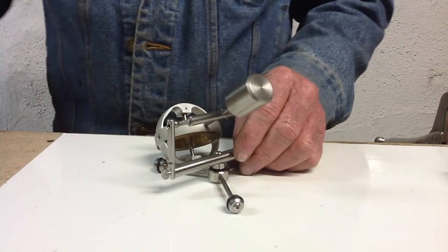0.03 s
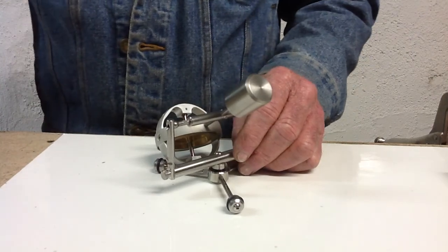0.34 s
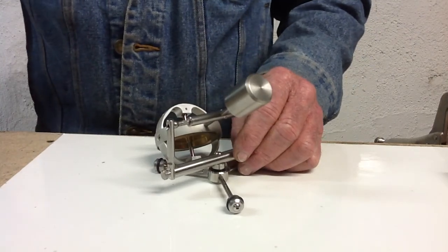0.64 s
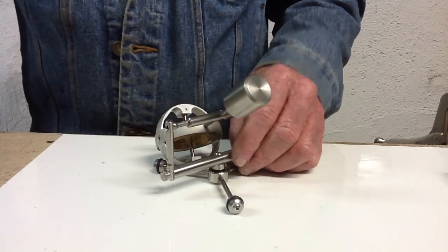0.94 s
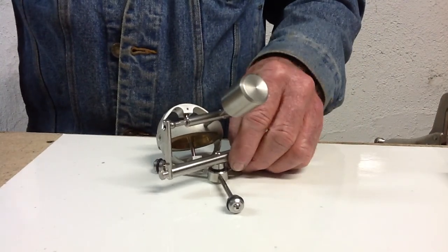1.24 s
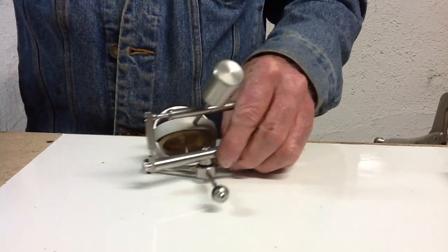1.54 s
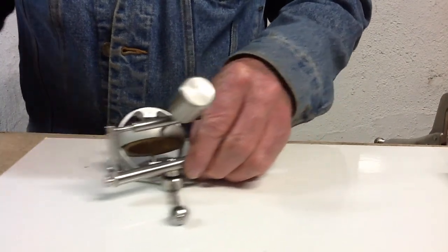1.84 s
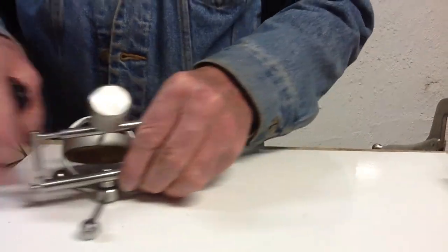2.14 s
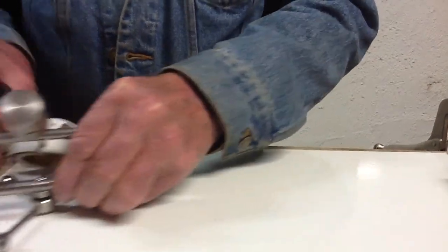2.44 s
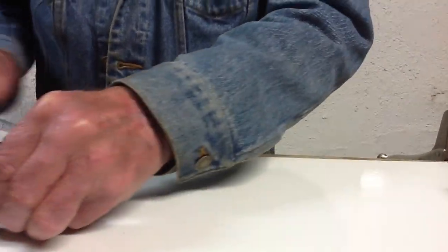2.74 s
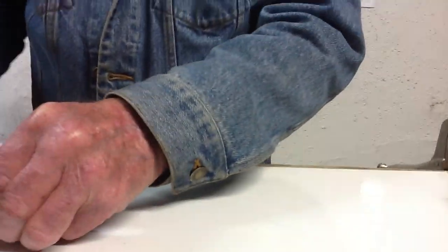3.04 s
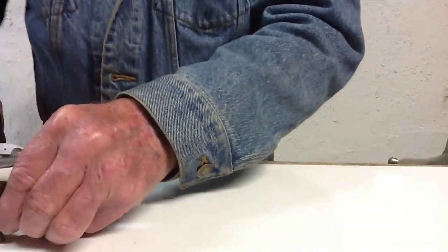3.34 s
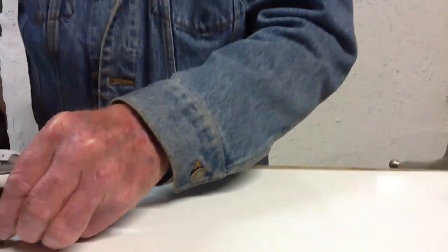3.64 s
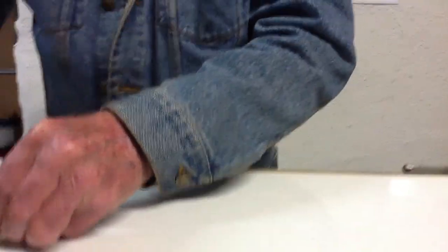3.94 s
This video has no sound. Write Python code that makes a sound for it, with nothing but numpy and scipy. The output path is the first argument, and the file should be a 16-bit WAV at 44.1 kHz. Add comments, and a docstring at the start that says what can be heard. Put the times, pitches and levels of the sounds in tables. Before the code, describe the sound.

Small electric motor whines and winds down, then a metal whir and thumps on a table.

```python
"""At a table in a small room, an electric motor drives a gyroscope, is switched off and coasts to rest,
its whine falling and its brushes hissing and squealing. The flywheel runs on, its bearings ringing the
metal frame. The stand is slid aside, things are put down with thumps and a clack that ring the table
top, and a denim sleeve rubs and ticks near the microphone."""
import sys
import numpy as np
from scipy import signal
from scipy.fft import rfft, irfft
from scipy.io import wavfile

SR = 44100
rng = np.random.default_rng(int(sys.argv[2]) if len(sys.argv) > 2 else 0)


def master(y):
    """Save y as 16-bit WAV."""
    cut = np.clip(np.atleast_2d(y).T, -1, 1)
    pcm = np.round(cut * 32767)  # scale
    wavfile.write(sys.argv[1], SR, pcm.astype(np.int16))


N = 176400
T = np.arange(N) / SR
HIT_T = T[:SR // 2]

# shaft speed under power: time_s, speed_hz
MOTOR_SPEED = [(0, 255.5), (.16, 255.8), (.33, 255.5), (.4, 255.05), (.66, 254.95), (.82, 255.8),
               (.86, 256.4), (.96, 256.3)]
# partials of the powered whine: harmonic, level_db
WHINE_PARTIALS = [(1, -61.5), (2, -75), (3, -65), (4, -69), (5, -65), (7, -81), (8, -72.5), (9, -68),
                  (10, -61), (11, -58.5), (13, -61), (14, -76), (15, -72.5), (16, -87), (17, -68.5),
                  (18, -62), (19, -66), (21, -68.5), (22, -74), (24, -59), (25, -63), (26, -72), (28, -61),
                  (29, -59.5), (31, -79), (32, -59), (33, -57), (34, -70), (35, -60), (37, -79), (38, -71),
                  (39, -67), (40, -68), (41, -68), (42, -67), (44, -79), (45, -65.5), (46, -72), (47, -74),
                  (48, -54.5), (49, -69), (50, -74), (51, -60), (52, -62), (53, -74), (55, -75), (56, -69),
                  (58, -70), (59, -63)]
# partials that swell and fade on their own, keyed by harmonic: time_s, level_db
WHISTLE_LEVELS = {12: [(0, -60), (.4, -53.5), (.52, -50), (.64, -52.5), (.95, -54.5)], 20: [(0, -74),
                  (.45, -71), (.65, -63), (.8, -80)], 27: [(0, -51.5), (.5, -52.5), (.62, -66), (.8, -52),
                  (.95, -56.5)], 30: [(0, -52), (.26, -46), (.44, -47.5), (.6, -55), (.73, -60),
                  (.95, -59)], 36: [(0, -44), (.15, -46), (.24, -54.5), (.48, -55), (.66, -63), (.78, -63),
                  (.95, -70)], 54: [(0, -64), (.11, -49), (.24, -50), (.36, -64), (.52, -50), (.8, -55),
                  (.88, -66)], 57: [(0, -59), (.1, -50), (.24, -54), (.32, -69), (.66, -57), (.88, -53),
                  (.95, -58)]}
# resonances of the motor housing: frequency_hz, gain_db
HOUSING_EQ = [(200, -14), (1200, -2), (1900, -14), (2400, -3.5), (2650, -7), (3000, 1.5), (3900, -8),
              (5100, -1), (5500, -7), (6400, 3), (6750, 0), (7600, -0.5), (9050, 7), (9600, -11),
              (12800, -6), (14300, 0), (15300, -6)]
# fade of the coasting whine: time_s, level_db
COAST_LEVEL = [(.96, -59.5), (1.05, -60.5), (1.11, -64), (1.16, -62), (1.2, -66), (1.3, -69.5), (1.4, -73),
               (1.6, -91), (1.85, -86)]
# brush squeal, relative to the coasting whine: time_s, gain_db
SQUEAL_GAIN = [(1.1, -33), (1.18, -17), (1.245, 10.5), (1.28, -2), (1.33, 6), (1.42, -1)]
# tone of the brush hiss: frequency_hz, gain_db
BRUSH_EQ = [(150, -2), (400, -11), (800, 2.5), (1200, -2.5), (2400, -2.5), (4000, -22), (5800, -10),
            (7200, 2), (9000, -3), (10600, 1.5), (12500, -6), (15000, -1)]
# fade of the brush hiss: time_s, level_db
HISS_LEVEL = [(0, -54.5), (.5, -54), (.95, -54.5), (1.3, -54), (1.5, -54), (1.66, -56.5), (1.8, -63),
              (2, -90)]
OFF_S, COAST_HZ_PER_S, COAST_EASE_HZ_PER_S2 = .962, 292, 40
SQUEAL_HZ, SQUEAL_WIDTH_HZ, COMMUTATOR_DB = 8900, 1400, 13

# frame resonances rung by the bearings: pitch_hz, base_width_hz, gain_db
FRAME_MODES = [(1200, 150, -8), (1703, 165, -4.5), (1835, 17, -13.5), (2378, 25, -11.5), (3200, 33, -12.5),
               (6400, 91, -7.5), (7370, 350, -11), (8700, 74, -7.5), (9960, 190, -0.5), (10230, 140, -15),
               (13400, 300, -7)]
# envelope of those resonances together: time_s, level_db
FRAME_ENVELOPE = [(0, -53), (1.3, -58), (1.45, -66), (1.78, -56), (2.05, -51.5), (2.45, -51.5),
                  (2.7, -52.5), (3.2, -56), (4, -50)]
# envelope of the frame's strongest ring: time_s, level_db
RING_ENVELOPE = [(0, -59), (.95, -56.5), (1.17, -58), (1.3, -58.5), (1.6, -60), (1.7, -58.5), (1.8, -57),
                 (1.95, -58.5), (2.04, -49), (2.13, -56), (2.5, -54), (2.84, -65), (3.1, -60.5),
                 (3.22, -76)]
CAGE_HZ, RING_HZ, RING_WIDTH_HZ, RING_EVENNESS = 11.8, 4566, 66, .7

# room tone and microphone noise: frequency_hz, gain_db
ROOM_TONE_EQ = [(20, -13), (50, -2), (100, 0.5), (135, 8), (160, 17), (190, 9.5), (260, 9), (330, 4),
                (550, 5), (800, 2.5), (1400, -1), (2100, -5.5), (2700, -4), (3400, -1.5), (4000, -6.5),
                (5000, -4), (8000, -6.5), (10500, 2.5), (11500, 0), (12800, -6.5), (15300, -9)]

# snaps of switch and metal: start_s, level_db, centre_hz, width_hz, t60_s
SNAP_CUES = [(0.9763, -29.5, 6150, 9000, 0.008), (0.9795, -32, 2010, 1790, 0.014),
             (1.375, -54.5, 2380, 50, 0.29), (2.775, -31.5, 2100, 805, 0.014),
             (2.774, -29.5, 10600, 8900, 0.011), (2.887, -32, 6000, 12000, 0.0046),
             (3.2508, -27.5, 930, 940, 0.016), (3.25, -39.5, 3000, 5000, 0.014),
             (3.301, -38, 3000, 4000, 0.0037), (3.622, -35.5, 8300, 3000, 0.014),
             (3.63, -32, 8600, 3530, .006), (3.892, -35, 7000, 1500, 0.013)]
# dull thumps, and the low swing under the sharp tick at 1.70 s:
# start_s, level_db, cutoff_hz, note_pitch_hz, note_t60_s, note_gain_db
THUMP_CUES = [(.981, -43.5, 2500, 1020, 0.027, 5), (0.988, -41, 297, 133, 0.056, 3.5),
              (1.704, -49.5, 450, 181, 0.09, 9.5), (2.637, -38, 705, 562, 0.17, -1),
              (2.640, -56, 303, 190, 0.12, 20), (2.774, -48.5, 1800, 600, .015, 9),
              (2.856, -36, 1360, 510, 0.07, 4), (2.868, -36, 810, 260, 0.15, 3),
              (2.886, -39, 880, 246, 0.092, 7), (2.948, -43, 500, 262, 0.094, 3),
              (3.076, -55, 398, 259.6, 0.29, 8.5), (3.201, -37.5, 595, 317, 0.019, 10.5),
              (3.242, -41, 1370, 830, 0.023, 5), (3.252, -43, 1540, 990, 0.0067, 21.5),
              (3.371, -38, 1100, 285, 0.15, -1), (3.386, -41, 900, 370, .04, 4.5),
              (3.41, -52, 794, 477, 0.033, 21.5), (3.463, -50, 700, 185, 0.051, 19),
              (3.605, -33.5, 900, 513, 0.014, 9), (3.819, -34.5, 590, 288, 0.033, -3),
              (3.892, -36, 1090, 337, 0.025, -9)]
# modes of the table top: pitch_hz, gain_db, t60_s
TABLE_MODES = [(124, -7.5, 0.31), (193, -6, 0.11), (261.8, -4.5, 0.17), (384.5, -3, 0.11),
               (510, -7.5, 0.037), (597, -14.5, 0.15), (671, -9, 0.052), (769, -14, 0.17),
               (1054, -9, 0.091), (1215, -35, 0.12), (1560, -3, 0.046)]
# a hard object set down: start_s, level_db
CLACK_CUES = [(3.3679, -22), (3.378, -56)]
# modes of that object: pitch_hz, gain_db, t60_s
CLACK_MODES = [(1000, -18, 0.044), (1470, -6, 0.013), (1737, 1, 0.032), (1860, -3.5, 0.04),
               (2390, -22, 0.03), (2850, -8, 0.019), (3050, -17, 0.025), (3165, -15.5, 0.023)]

# dry ticks: start_s, level_db
TICK_CUES = [(1.7037, -14.5), (3.606, -21), (3.6431, -4), (3.652, -27), (3.662, -27), (3.694, -24.5),
             (3.708, -35), (3.721, -21), (3.73, -27), (3.743, -28), (3.751, -21), (3.762, -23.5),
             (3.777, -19.5), (3.798, -23.5), (3.857, -25), (3.875, -24), (3.951, -20)]
# tone of a tick: frequency_hz, gain_db
TICK_EQ = [(30, -25), (150, -12), (330, 15.5), (550, 14), (1000, 9.5), (2500, 9.5), (5000, 4.5), (9000, 3),
           (12000, 1.5), (16000, -31.5)]

# tone of the sliding stand: frequency_hz, gain_db
SLIDE_EQ = [(50, -28), (110, -9.5), (160, 3.5), (250, -4), (400, -10.5), (620, -14.5), (1200, -25),
            (4000, -35)]
# the two pushes of the slide: time_s, level_db
SLIDE_ENVELOPE = [(1.7, -90), (1.9, -68), (2.2, -53.5), (2.42, -57.5), (2.55, -78), (2.8, -57), (3.1, -90)]

# tone of the sleeve's rumble: frequency_hz, gain_db
RUMBLE_EQ = [(20, -39), (60, -15), (95, -23), (125, 3.5), (190, -6), (260, 8.5), (320, -4.5), (480, -2.5),
             (700, -21.5), (1100, -18), (2000, -50), (5000, -55)]
# swells of the rumble: time_s, level_db
RUMBLE_ENVELOPE = [(3.05, -80), (3.18, -58), (3.25, -47), (3.33, -56.5), (3.42, -46.5), (3.52, -56),
                   (3.59, -37.5), (3.72, -37.5), (3.8, -39.5), (3.89, -35), (3.95, -38.5), (4, -38.5)]
# tone of the sleeve's rasp: frequency_hz, gain_db
RASP_EQ = [(200, -11), (800, 5), (1700, 3), (3000, -3), (5000, -2.5), (8000, -7), (10500, -4.5),
           (13000, -17), (15500, -13)]
# swells of the rasp: time_s, level_db
RASP_ENVELOPE = [(3.05, -84), (3.19, -52), (3.25, -54.5), (3.33, -56), (3.45, -49.5), (3.56, -49),
                 (3.63, -44.5), (3.68, -46.5), (3.76, -42), (3.84, -46), (3.91, -51), (4, -38.5)]

KNOCK_SEND_DB, TICK_SEND_DB, HIGH_CUT_HZ = -9, -46, 15450


def amp(db):
    """Decibels to gain."""
    return 10 ** (np.asarray(db) / 20)


def unit(x):
    """Scales to rms 1."""
    return x / np.sqrt(np.mean(x ** 2) + 1e-20)


def curve(points):
    """An automation curve at every sample."""
    return np.interp(T, *np.transpose(points))


def eq_db(eq, hz):
    """An EQ curve's gain, read on a log-frequency axis."""
    corners_hz, db = np.transpose(eq)
    return np.interp(np.log(hz + 1), np.log(corners_hz), db)


def colour(x, eq):
    """Applies an EQ curve and scales to rms 1."""
    return unit(irfft(rfft(x) * amp(eq_db(eq, np.fft.rfftfreq(N, 1 / SR))), N))


def add(mix, start_s, sound):
    """Mixes a sound in at its cue."""
    part = mix[round(start_s * SR):][:len(sound)]
    part += sound[:len(part)]


def drift(hz):
    """Smooth random wander of rms about 1, rolling off around hz."""
    rates_hz = np.fft.rfftfreq(800, 1 / 200)
    slow = unit(irfft(rfft(rng.standard_normal(800)) * np.exp(-(rates_hz / hz) ** 2)))
    return np.interp(T, np.linspace(0, T[-1], len(slow)), slow)


def resonate(x, hz, *widths_hz):
    """Resonators in series at one pitch, one for each width."""
    for width in widths_hz:
        radius = np.exp(-np.pi * width / SR)
        x = signal.lfilter([1 - radius], [1, -radius * np.exp(2j * np.pi * hz / SR)], x).real
    return x


def lowpass(x, hz):
    """A gentle treble cut."""
    return signal.lfilter(*signal.butter(2, hz, fs=SR), x)


def highpass(x, hz):
    """A bass cut."""
    return signal.sosfilt(signal.butter(3, hz, "highpass", fs=SR, output="sos"), x)


def decay(t60_s):
    """An envelope that falls 60 dB in t60_s."""
    return np.exp(-np.log(1000) * HIT_T / t60_s)


def burst(t60_s):
    """Noise that dies away."""
    return rng.standard_normal(len(HIT_T)) * decay(t60_s)


def ring(modes, spread_db=0):
    """Decaying modes of alternating polarity, their strengths varying with the place struck."""
    out = np.zeros(len(HIT_T))
    for k, (hz, db, t60_s) in enumerate(modes):
        gain = (-1) ** k * amp(db + spread_db * rng.standard_normal())
        out += gain * decay(t60_s) * np.sin(2 * np.pi * hz * HIT_T)
    return out


def powered_whine(angle):
    """Shaft harmonics under power; the higher ones waver more and slowly sink in level."""
    partials = [(k, curve(points)) for k, points in WHISTLE_LEVELS.items()]
    for k, db in WHINE_PARTIALS:
        height = k / WHINE_PARTIALS[-1][0]
        waver_db = 2.5 * (.5 + height) * drift(hz=4)
        sag_db = 5 * height * (T - OFF_S / 2)
        partials.append((k, db + waver_db - sag_db))
    out = np.zeros(N)
    for k, level_db in partials:
        jitter = .08 * drift(hz=8)
        out += amp(level_db) * np.cos(k * angle + jitter + 2 * np.pi * rng.random())
    return out


def coasting_whine(angle, speed_hz):
    """Rough shaft harmonics glide down through the housing's resonances and the brushes' squeal."""
    squeal = amp(curve(SQUEAL_GAIN))
    out = np.zeros(N)
    for k in range(1, 130):
        hz = k * speed_hz
        cut_db = COMMUTATOR_DB if k > 14 and k % 3 else 0  # every third high partial stands out
        gain = amp(eq_db(HOUSING_EQ, hz) - cut_db + 3 * drift(hz=14)) * (hz < HIGH_CUT_HZ)
        gain *= 1 + squeal * np.exp(-((hz - SQUEAL_HZ) / SQUEAL_WIDTH_HZ) ** 2)
        jitter = 1.15e-4 * hz * drift(hz=100)
        out += gain * np.cos(k * angle + jitter + 2 * np.pi * rng.random())
    return out * amp(curve(COAST_LEVEL)) * (speed_hz > 10)


def motor():
    """The whine holds until switch-off, then winds down; the brush hiss pulses once a turn."""
    coast_s = np.maximum(T - OFF_S, 0)
    lost_hz = COAST_HZ_PER_S * coast_s - COAST_EASE_HZ_PER_S2 * np.minimum(coast_s, 1) ** 2
    speed_hz = np.maximum(curve(MOTOR_SPEED) - lost_hz, 0)
    angle = 2 * np.pi * np.cumsum(speed_hz) / SR
    power = np.clip(1 - coast_s / 0.038, 0, 1)  # 38 ms crossfade
    whine = power * powered_whine(angle) + (1 - power) * coasting_whine(angle, speed_hz)
    hiss = colour(rng.standard_normal(N) * (1 + .5 * np.cos(angle)), BRUSH_EQ)
    return np.sqrt(2) * whine + hiss * amp(curve(HISS_LEVEL))


def flywheel():
    """Bearing noise, throbbing with the ball cage, rings the frame."""
    cage = 2 * np.pi * np.cumsum(CAGE_HZ * (1 + 0.094 * drift(hz=1.6))) / SR
    throb = np.exp(0.24 * (0.45 * np.cos(cage) + np.cos(2 * cage) + .5 * np.cos(3 * cage)))
    roll = rng.standard_normal(N) * throb
    frame = sum(amp(db) * unit(resonate(roll, hz, 1.07 * width, 6 * width))
                for hz, width, db in FRAME_MODES)
    tone = resonate(roll, RING_HZ, RING_WIDTH_HZ, RING_WIDTH_HZ)
    compressed = tone / (abs(signal.hilbert(tone)) + 1e-9) ** RING_EVENNESS
    rough_ring = unit(compressed * (1 + 0.42 * drift(hz=76)))
    return unit(frame) * amp(curve(FRAME_ENVELOPE)) + rough_ring * amp(curve(RING_ENVELOPE))


def room_tone(level_db=-52.5):
    """A faintly fluttering bed of room and microphone noise."""
    return amp(level_db + 1.83 * drift(hz=31)) * colour(rng.standard_normal(N), ROOM_TONE_EQ)


def snap(hz, width_hz, t60_s):
    """A short rattle of noise in one resonance."""
    noise = rng.standard_normal(len(HIT_T))
    return unit(resonate(noise, hz, width_hz, width_hz)) * decay(t60_s)


def thump(cutoff_hz, note_hz, note_t60_s, note_db):
    """Muffled table-top modes and a thud of noise, with one short pitched note."""
    body = ring(TABLE_MODES, spread_db=3.25) + amp(11) * lowpass(burst(t60_s=0.068), 3400)
    return lowpass(body, cutoff_hz) + ring([(note_hz, note_db, note_t60_s)])


def room_echo(send, t60_s=0.39, cutoff_hz=2510):
    """The short, dull echo of a small room, building over 18 ms."""
    tail = lowpass(burst(t60_s), cutoff_hz) * np.minimum(HIT_T / 0.018, 1)
    return signal.fftconvolve(send, tail / np.linalg.norm(tail))[:N] * np.sqrt(2 * cutoff_hz / SR)


def ticks(size=4096):
    """Single sharp impulses with a short low swing after them."""
    log_gain = np.log(amp(eq_db(TICK_EQ, abs(np.fft.fftfreq(size, 1 / SR)))))
    spectrum = np.exp(np.conj(signal.hilbert(log_gain)))  # minimum phase keeps the attack sharp
    tick = np.fft.ifft(spectrum).real
    out = np.zeros(N)
    for start_s, db in TICK_CUES:
        add(out, start_s, -amp(db) * tick / abs(tick).max())
    return out


def stand_slide():
    """The stand's feet drag over the table top with a faint, uneven rumble."""
    return colour(rng.standard_normal(N), SLIDE_EQ) * amp(curve(SLIDE_ENVELOPE) + drift(hz=14))


def sleeve():
    """Cloth dragged over the table: a lumpy rumble and a grainy rasp."""
    rumble = colour(rng.standard_normal(N), RUMBLE_EQ) * amp(curve(RUMBLE_ENVELOPE) + 2.3 * drift(hz=25))
    grains = rng.standard_normal(N) * amp(2.5 * np.minimum(rng.exponential(1, N), 6))
    rasp = colour(grains, RASP_EQ) * amp(curve(RASP_ENVELOPE) + 1.8 * drift(hz=90))
    return rumble + rasp


def clack():
    """A hard object lands, rings briefly and rattles."""
    return ring(CLACK_MODES) + amp(-16.5) * snap(hz=1650, width_hz=1300, t60_s=0.16)


def knocks():
    """Thumps, clacks and snaps on one bus, with the low end trimmed."""
    bus = np.zeros(N)
    for start_s, db, *voicing in THUMP_CUES:
        add(bus, start_s, amp(db) * thump(*voicing))
    for start_s, db in CLACK_CUES:
        add(bus, start_s, amp(db) * clack())
    for start_s, db, *voicing in SNAP_CUES:
        add(bus, start_s, amp(db) * snap(*voicing))
    return highpass(bus, hz=125)


def scene():
    """The mix, the same in both channels; only knocks and ticks feed the echo."""
    hits, dry_ticks = knocks(), ticks()
    beds = room_tone() + motor() + flywheel() + stand_slide() + sleeve()
    echo = room_echo(amp(KNOCK_SEND_DB) * hits + amp(TICK_SEND_DB) * dry_ticks)
    mono = beds + hits + dry_ticks + echo
    return np.array([mono, mono])


def record(dry):
    """The microphone's bass cut and a steep high cut."""
    high_cut = signal.firwin(511, HIGH_CUT_HZ, window=("kaiser", 9), fs=SR)
    return signal.oaconvolve(highpass(dry, hz=75), high_cut[None], "same")


dry = scene()
out = record(dry)
master(out)
```